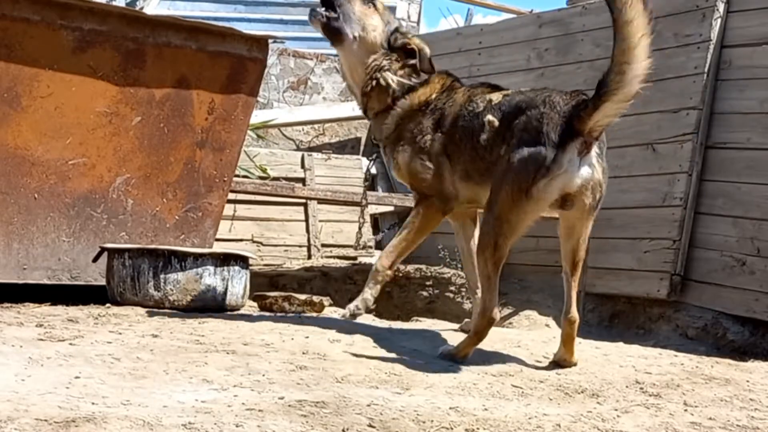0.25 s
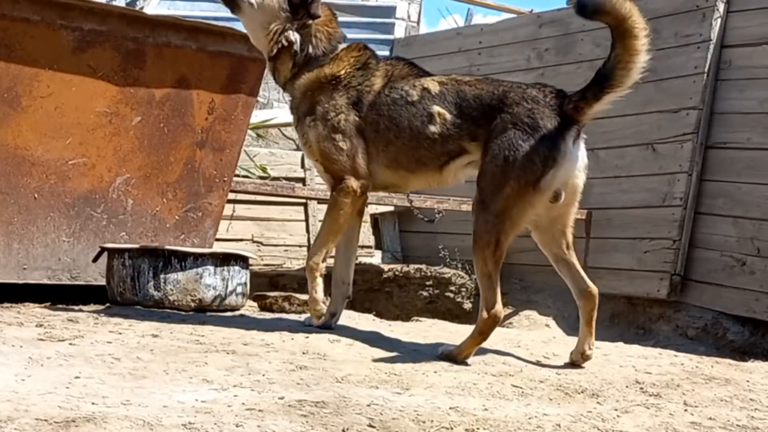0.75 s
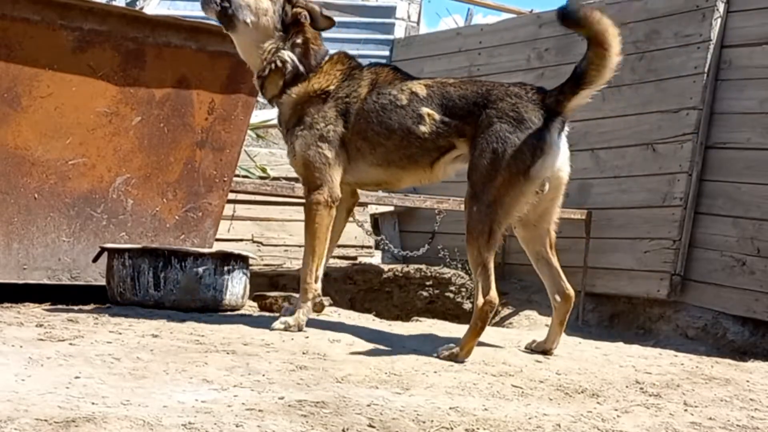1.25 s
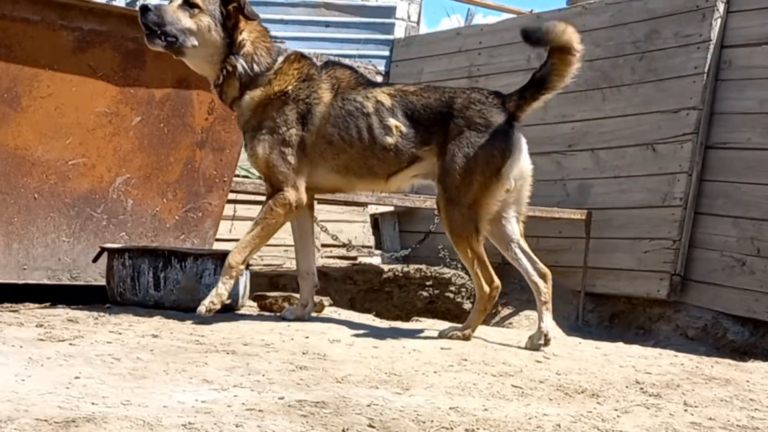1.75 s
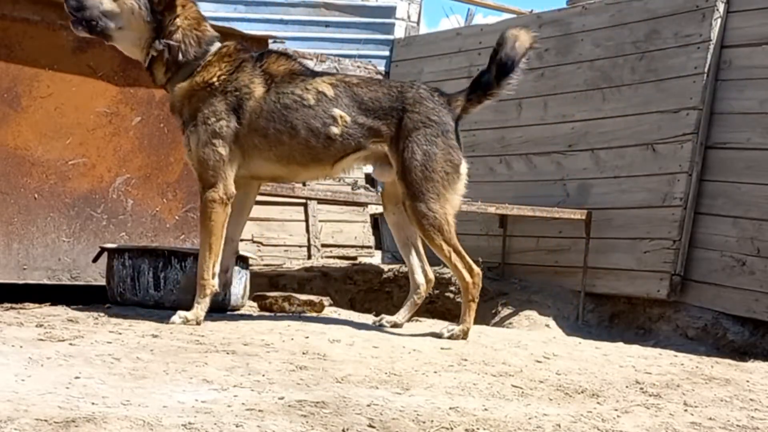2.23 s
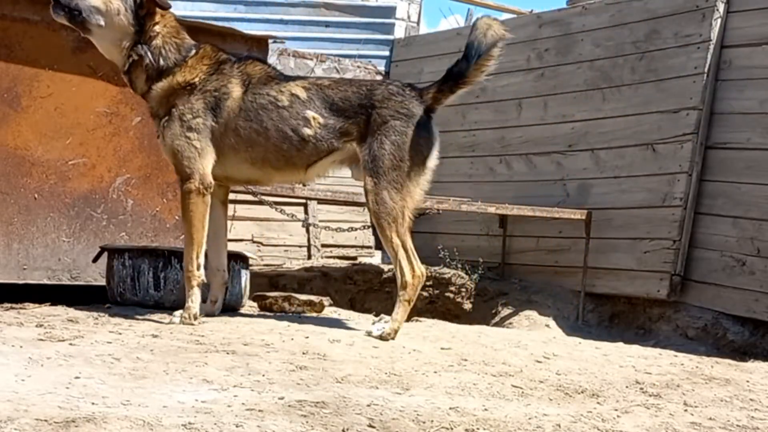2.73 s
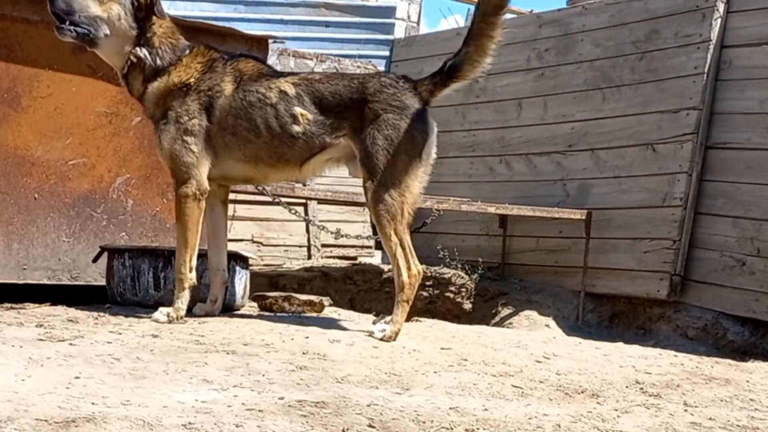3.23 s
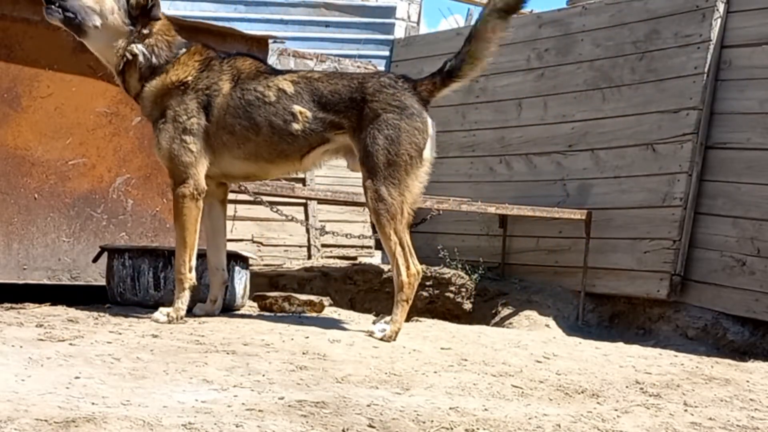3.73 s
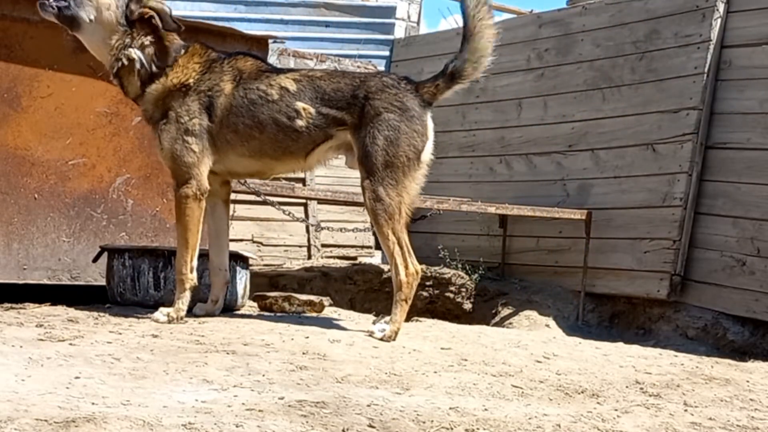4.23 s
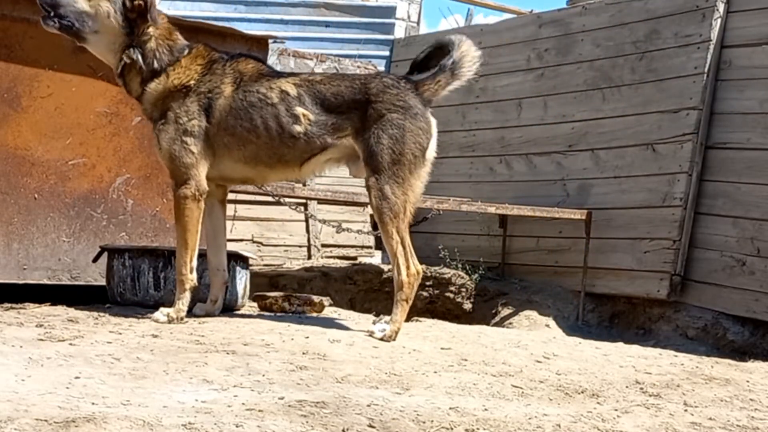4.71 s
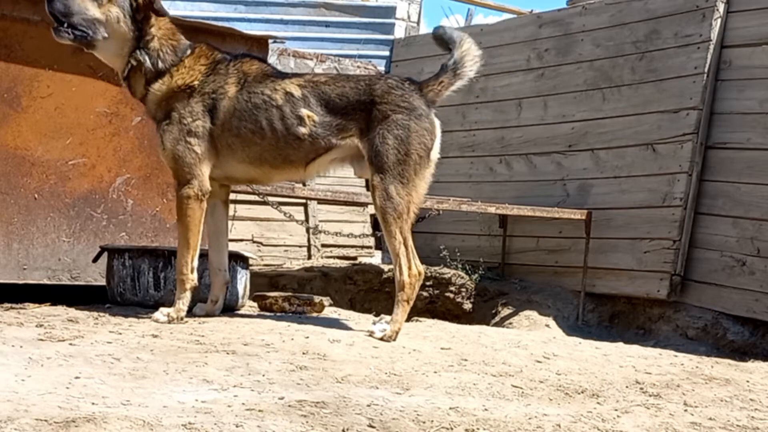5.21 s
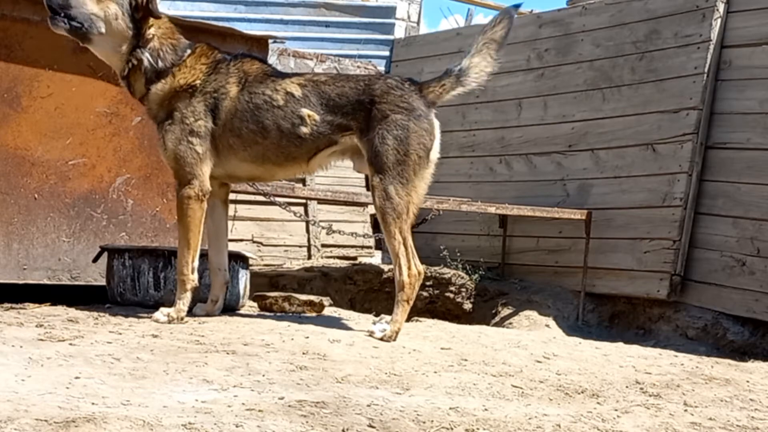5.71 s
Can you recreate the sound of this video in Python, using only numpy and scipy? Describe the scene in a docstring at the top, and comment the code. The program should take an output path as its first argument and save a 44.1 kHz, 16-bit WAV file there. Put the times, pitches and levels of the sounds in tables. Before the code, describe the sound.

A large dog, close and slightly to the left, opens with a short growl. Four quick barks follow at about 0.3, 0.6, 0.9 and 1.3 seconds, linked by a low, rough rumble and trailing off in a soft groan by 1.5 seconds. Under this run a chain slides very faintly and a paw scuffs on grit. A second growl with hard catches builds from 1.6 to 2 seconds. Then come six single barks, at about 2.1, 2.9, 3.7, 4.3, 4.9 and 5.6 seconds, with another faint scuff at 2.2 and a quiet growl around 2.6 seconds. Each bark is chesty, rising and falling in pitch, starting clear and breaking into a rasp. The sheds and fences of the yard add a short echo, and the background is only a very faint hush of outdoor air.

```python
"""A chained dog in a walled yard

A large dog growls, gives four barks linked by a low rumble and ending in a groan, growls again, then
barks six times. Its vocal folds are the source; chest, throat and mouth are the filters. Each bark is
an arch of pitch that starts clear and breaks into a rasp. Paws scuff; sheds and fences echo."""
import sys
import numpy as np
from scipy import signal
from scipy.fft import rfft, irfft, next_fast_len
from scipy.io import wavfile
from scipy.ndimage import map_coordinates

SR = 44100
rng = np.random.default_rng(int(sys.argv[2]) if len(sys.argv) > 2 else 0)


def waveform_to_disk(signal):
    """Save audio, clipped to [-1, 1], as 16-bit WAV at the path in sys.argv[1]."""
    frames = np.transpose(np.atleast_2d(signal))
    scaled = np.clip(frames, -1, 1) * 32767
    samples = np.round(scaled).astype(np.int16)
    wavfile.write(sys.argv[1], SR, samples)


N = 262836

BAND_LIMIT_HZ = 15600


def amp(db):
    """Decibels to gain."""
    return 10 ** (np.asarray(db) / 20)


def unit(x):
    """x scaled to rms 1."""
    return x / np.sqrt(np.mean(x ** 2) + 1e-20)


def along(points, hz):
    """(Hz, value) points read on a log axis."""
    f, v = np.transpose(points)
    return np.interp(np.log(hz + 1), np.log(f), v)


def curves(rows):
    """Sample times of a table's span, then each column at those times."""
    s, *cols = np.transpose(rows)
    t = np.arange(max(round(s[0] * SR), 0), round(s[-1] * SR)) / SR
    return [t] + [np.interp(t, s, c) for c in cols]


def add(track, s, x):
    """Mix x into the track from time s, with its last moments faded."""
    i, n = max(round(s * SR), 0), x.shape[-1]
    fade = np.minimum(np.arange(n)[::-1] / (.008 * SR), 1)
    track[..., i:i + n] += (x * fade)[..., :N - i]


def wobble(n, rate):
    """A smooth random curve, rate knots a second."""
    return map_coordinates(rng.standard_normal(int(n * rate / SR) + 4), [np.arange(n) * rate / SR])


def coloured(x, points):
    """x through a causal filter with the given spectrum."""
    m = 2 * next_fast_len(x.shape[-1] // 2 + 4096)
    cepstrum = irfft(np.log(amp(along(points, np.fft.rfftfreq(m, 1 / SR)))))
    cepstrum[1:m // 2] *= 2
    cepstrum[m // 2 + 1:] = 0
    return irfft(rfft(x, m) * np.exp(rfft(cepstrum)), m)[..., :x.shape[-1]]


def noise(n, points, gate=1):
    """Gated noise of rms 1 with the given spectrum."""
    return unit(coloured(gate * rng.standard_normal(n), points))


def partials(phase, pitch, tract, doubling, smear, count=14):
    """Harmonics under a resonance curve; period doubling adds lines halfway between them."""
    voice, power = 0, 1e-12
    for k in np.arange(1, count + 1) / 2:
        gain = amp(along(tract, k * pitch)) * (doubling if k % 1 else 1)
        stray = smear * k * wobble(len(phase), 130)  # uneven cycles blur the high harmonics most
        voice = voice + gain * np.sin(k * phase + rng.uniform(0, 2 * np.pi) + stray)
        power = power + gain ** 2 / 2
    return voice / np.sqrt(power)


def sliding_noise(points, gate, scale):
    """Time warping multiplies the resonance frequencies of a gated noise by scale."""
    clock = np.cumsum(scale)
    ticks = np.arange(int(clock[-1]) + 2)
    return map_coordinates(noise(len(ticks), points, np.interp(ticks, clock, gate)), [clock])


def blend(tone, air, share):
    """Uncorrelated signals add in power, so tone and turbulence mix at a constant level."""
    share = np.clip(share, 0, .95)
    return np.sqrt(1 - share ** 2) * tone + share * air


def gate(t, attack, release):
    """Trapezoidal envelope over the times t."""
    return np.clip(np.minimum((t - t[0]) / attack, (t[-1] - t) / release), 0, 1)


# Spectrum of the background: (frequency [Hz], level [dB])
AIR = [(25, -40.5), (100, -14), (300, -19.5), (460, -9), (880, -32.5), (1300, -22.5), (2200, -39.5),
       (15000, -43)]

def still_air(level_db=-81):
    """Partly coherent ambient noise: one hush common to both channels, a weaker one in each."""
    return amp(level_db) * (noise(N, AIR) + .5 * np.array([noise(N, AIR), noise(N, AIR)]))


# Decay of the diffuse field: (frequency [Hz], reverberation time [s])
DECAY = [(100, 0.2), (250, .45), (380, .62), (520, .56), (900, 0.61), (2000, 0.45), (5500, 0.85),
         (14000, .45)]
# Scattering by rough ground and boards close by: (frequency [Hz], level [dB])
SCATTER = [(60, -12.5), (130, -19.5), (500, -25.5), (2000, -15.5), (5000, 2), (12000, -7.5)]
# Wall reflections: (delay [s], level [dB])
WALLS = [(0.012, -13), (0.022, -17), (0.057, -28), (0.113, -33), (.19, -42.5)]

def yard(x, tail_db=-28.5, build_s=.0092, scatter_t60=.021, flutter_db=3):
    """Reverberation: close scatter, discrete reflections, then a fluttering diffuse tail."""
    hz, t, bands = signal.stft(rng.standard_normal((3, SR)), SR, nperseg=256)
    decay = amp(-60 * t / along(DECAY, hz)[:, None])
    tails = signal.istft(bands * decay * (1 - np.exp(-t / build_s)), SR, nperseg=256)[1]
    far = tails[0] + tails[1:]  # close microphones share part of the tail
    far *= amp(tail_db) / np.linalg.norm(far[0])
    near = rng.standard_normal(far.shape) * amp(-60 * np.arange(far.shape[1]) / SR / scatter_t60)
    near = coloured(near / np.linalg.norm(near[0]), SCATTER)
    for delay, db in WALLS:
        near[:, round(delay * SR)] += amp(db)
    early, late = [signal.fftconvolve(x, response, axes=1)[:, :N] for response in (near, far)]
    return early + late * amp(flutter_db * wobble(N, 55))


# Direction of the dog: (time [s], lead of the left microphone [ms])
BEARING = [(0, .07), (.7, 0.1), (1.7, 0.12), (2.7, 0.19), (6, 0.19)]

def microphones(x):
    """Time and level cues: the dog stands to the left, so that side is earlier and louder."""
    i = np.arange(N)
    lead = np.interp(i / SR, *np.transpose(BEARING)) * SR / 1000
    left = map_coordinates(x[0], [i + lead / 2])
    right = map_coordinates(x[1], [i - lead / 2])
    return np.array([left, right]) * amp([[.6], [-.6]])


# Envelope of the sliding chain: (time [s], level [dB])
CHAIN_LEVEL = [(0.33, -73.5), (0.428, -67.5), (0.486, -69), (0.942, -87), (1.1, -78), (1.2, -85.5),
               (1.3, -90)]
# Resonances of its links: (frequency [Hz], level [dB])
LINKS = [(2000, -38), (2750, -19), (3050, 5), (3400, -15.5), (5000, -25.5), (6200, -13), (9000, -30.5),
         (11000, -15), (12500, -29.5)]

def chain(gain_db=4):
    """Sliding friction rings the links faintly as the dog steps about."""
    out = np.zeros(N)
    t, db = curves(CHAIN_LEVEL)
    rubbing = amp(3 * wobble(len(t), 40))
    add(out, t[0], amp(db + gain_db) * noise(len(t), LINKS, rubbing))
    return out


# Paw strokes: (time [s], level [dB], time to fall 60 dB [s])
SCUFFS = [(.664, -34, .1), (2.187, -39.5, .2), (2.218, -47, .35)]
# Spectrum of dry grit: (frequency [Hz], level [dB])
GRIT = [(800, -28.5), (2500, 2), (4000, 4), (7000, -7), (10000, -14.5), (15000, -13.5)]

def scuffs(gain_db=-7):
    """Granular friction: a paw on grit makes a spiky burst that decays exponentially."""
    out, t = np.zeros(N), np.arange(SR // 4) / SR
    for start, db, t60 in SCUFFS:
        grains = amp(5 * wobble(len(t), 600))
        add(out, start, amp(db + gain_db - 60 * t / t60) * noise(len(t), GRIT, grains))
    return out


# Contour of the groan: (time [s], pitch [Hz], level [dB])
GROAN_CONTOUR = [(1.32, 215, -38.5), (1.354, 170, -45), (1.41, 128.8, -48), (1.492, 128, -44.5),
                 (1.53, 124, -54)]

def groan(gain_db=-1):
    """Low-pitched phonation: the run of barks trails off in a soft hum of blurred harmonics."""
    out = np.zeros(N)
    t, pitch, db = curves(GROAN_CONTOUR)
    phase = 2 * np.pi * np.cumsum(pitch) / SR
    tract = [(130, 3.5), (250, -8.0), (400, 3.5), (800, -41.5)]  # (frequency [Hz], level [dB])
    add(out, t[0], amp(db + gain_db) * partials(phase, pitch, tract, doubling=.05, smear=.78))
    return out


# Growls: (start [s], end [s], first level [dB], last level [dB], relative hiss level [dB])
GROWLS = [(0, .19, -31.5, -58, -17), (1.59, 1.974, -53.5, -42.5, -17.5), (2.45, 2.731, -49, -49.5, -22)]
# Spectra of the growling throat and of its escaping air: (frequency [Hz], level [dB])
GROWL_TONE = [(20, -51), (55, -6), (110, 6.5), (200, -4), (370, 1.5), (500, 3.5), (800, -18), (1200, -7.5),
              (1700, -25.5), (2400, -19.5), (4000, -47.5)]
GROWL_HISS = [(1000, -21.5), (2300, 1), (4000, -3.5), (6000, -6), (8500, -17.5), (15000, -21.5)]

def growls(flap_hz=35, throat_db=-1):
    """Pulse phonation: each slow, uneven flap of loose folds thumps the throat and lets out air."""
    out = np.zeros(N)
    for start, end, first_db, last_db, hiss_db in GROWLS:
        t, db = curves([(start, first_db), (end, last_db)])
        n = len(t)
        cycles = np.cumsum(flap_hz * np.exp(.14 * wobble(n, 25))) / SR
        strength = amp(1.8 * wobble(n, 30))
        flaps = np.diff(np.floor(cycles), prepend=0) * strength
        spurts = strength * (np.exp(-(cycles % 1) / .43) + .14)
        tone = unit(unit(coloured(flaps, GROWL_TONE)) + 2.5 * noise(n, GROWL_TONE, spurts))
        voice = amp(throat_db) * tone + amp(hiss_db) * noise(n, GROWL_HISS, spurts)
        add(out, t[0], amp(db) * gate(t, attack=.027, release=.021) * voice)
    return out


# Hard catches in the growl: (time [s], level [dB], relative hiss level [dB])
SNARLS = [(0.014, -28.5, -31.5), (0.038, -27.5, -35), (1.654, -39.5, -26.5), (1.756, -42, -18),
          (1.855, -29.5, -24.5), (1.885, -29, -19.5), (2.507, -40, -25.5), (2.609, -37, -32),
          (2.635, -40, -35.5), (2.658, -37, -36.5)]

def snarls(thump_db=-10, edge_db=-8, ring_hz=450, attack_s=.00083):
    """Impulse excitation: a single hard flap gives a damped ring with an edge of hiss."""
    out, t = np.zeros(N), np.arange(SR // 20) / SR
    swell = 1 - np.exp(-t / attack_s)
    for start, db, hiss_db in SNARLS:
        ring = np.sin(2 * np.pi * ring_hz * t) * amp(-60 * t / .027) * swell
        breath = noise(len(t), GROWL_TONE, swell * amp(-60 * t / .034))
        thump = unit(unit(ring) + .3 * breath)
        edge = noise(len(t), GROWL_HISS, amp(-60 * t / .012))
        add(out, start, amp(db + thump_db) * thump + amp(db + hiss_db + edge_db) * edge)
    return out


# Chest response between barks that run together: (frequency [Hz], level [dB])
GRUMBLE = [(20, -53), (60, -22.5), (120, -13), (200, -4.5), (300, -2), (430, 0), (530, -6), (640, -27),
           (900, -70.5)]

def grumble(start=.38, end=1.18, level_db=-37.5, top_hz=470, lowest_hz=169.4, glide_hz_per_s=2100):
    """Sustained phonation: within the run the voice sinks to a rough, low note and climbs again."""
    out, t = np.zeros(N), np.arange(start, end, 1 / SR)
    n = len(t)
    from_top = np.min([np.abs(t - row[0]) for row in BARKS], axis=0)
    note = np.maximum(top_hz - glide_hz_per_s * from_top, lowest_hz)
    pitch = note * (1 + .05 * wobble(n, 170))
    phase = 2 * np.pi * np.cumsum(pitch) / SR
    tone = partials(phase, pitch, GRUMBLE, doubling=.16, smear=.4)
    voice = blend(tone, noise(n, GRUMBLE), share=.51)
    add(out, start, amp(level_db + 2 * wobble(n, 60)) * gate(t, .026, .026) * voice)
    return out


# Spectrum of air passing teeth and lips: (frequency [Hz], level [dB])
HISS = [(2000, -24), (3000, -3.5), (3500, -1), (4150, -15.5), (5150, 2.5), (6100, 2.5), (6850, -1.5),
        (7700, -12), (9500, -15.5), (12500, -9), (15500, -14)]

def teeth(puffs, scale, ring_t60=.014):
    """Turbulence excites narrow resonances, new for each bark and partly coherent across channels."""
    t = np.arange(SR // 50) / SR
    cavity = rng.standard_normal(len(t)) * amp(-60 * t / ring_t60)
    air = np.array([sliding_noise(HISS, puffs, scale) for _ in range(3)])
    return unit(signal.fftconvolve(air[0] + air[1:], cavity[None], axes=1)[:, :len(puffs)])


# Mouth response in the early barks and, head turned away, the late: (frequency [Hz], level [dB])
MOUTH_EARLY = [(550, -46), (760, -8.5), (880, -3), (1000, -10), (1170, -2.5), (1310, 7.5), (1490, -13.5),
               (1640, -12), (1820, -7.5), (2080, -17.5), (2400, -31), (3150, -28), (3900, -47.5),
               (6000, -55)]
MOUTH_LATE = [(550, -44.5), (750, -5), (860, 4), (1000, -7.5), (1170, -1), (1350, 2.5), (1580, -6.5),
              (1880, -12), (2130, -7), (2450, -21.5), (3000, -25.5), (3450, -25), (3950, -37), (6000, -51)]

def mouth(phase, pitch, rough, puffs, jaw, early):
    """Formants filter harmonics and breath; a shutting jaw lowers them by the factor jaw."""
    tract = MOUTH_EARLY if early else MOUTH_LATE
    tone = partials(phase, pitch / jaw, tract, doubling=rough ** 2, smear=.07 + .2 * rough)
    return blend(tone, sliding_noise(tract, puffs, jaw), 1.05 * rough)


# Throat resonance: (frequency [Hz], level [dB])
THROAT = [(400, -53), (540, -6), (635, 2.5), (700, -5), (780, -14.5), (1000, -54)]

def throat(phase, pitch, rough, puffs):
    """A single resonance picks out the period doubling and turbulence of the rasp."""
    tone = partials(phase, pitch, THROAT, doubling=rough, smear=.4 * rough, count=8)
    return blend(tone, noise(len(pitch), THROAT, puffs), .75 * rough)


# Chest response with taut folds, then with slack folds: (frequency [Hz], level [dB])
CHEST = [(20, -66), (45, -26.5), (75, -19.5), (115, -14.5), (160, -16), (260, -12), (340, -7), (400, -6.5),
         (455, 1), (540, -5.5), (640, -36), (900, -68.5)]
GRUNT = [(20, -66), (45, -37), (75, -22.5), (115, -12), (170, -15), (270, -16.5), (380, -2.5), (450, 3.5),
         (530, -2.5), (640, -30.5), (900, -70)]

def chest(phase, pitch, rough, slack, flutter, early):
    """Low resonances carry the fluttering fundamental, which gives way to noise as folds slacken."""
    n = len(pitch)
    tone = partials(phase, pitch, CHEST, doubling=.043 * rough, smear=.42 * rough, count=10)
    flutter_db = 8 * np.clip(flutter, 0, .5) * np.tanh(wobble(n, 110))
    spectrum, loose = (GRUMBLE, .7) if early else (GRUNT, 1.7)  # early on the folds never quite stop
    return blend(tone * amp(flutter_db), noise(n, spectrum), .11 * flutter * rough + loose * slack)


def envelope(t, pressure, opens, shuts, swell_db, attack, release, linger, sag):
    """Amplitude modulation [dB]: a swell with pressure, edges set by the jaw, a sag [dB/s]."""
    edges = np.maximum(-opens - t, 0) / attack + np.maximum(t - shuts - linger, 0) / release
    return swell_db * (pressure - 1) - 60 * edges - sag * t


# Resting pitch of the folds, which slacken after the run: (time [s], pitch [Hz])
REST_PITCH = [(.9, 174.9), (1.3, 140), (2.9, 116.1)]
# Barks: (time of top [s], top pitch [Hz], rise [s], fall [s], time of voice break [s], rasp [0-1],
# flutter [0-1], formant drop [0-1], mouth open before top [s], mouth open after top [s],
# chest fade after top [dB/s], chest level [dB], throat level [dB], mouth level [dB], hiss level [dB])
BARKS = [(.303, 462.1, .089, .095, .262, .6, 0.4, .12, .051, 0.076, 89.5, -8, -24.5, -22.5, -51.5),
         (.600, 460, .077, .094, 0.58, .95, .3, .16, .066, .066, 109.5, -8.5, -19, -25.5, -53),
         (.913, 422.2, .09, 0.087, 0.87, .75, .48, .22, .076, .059, -20, -17, -26, -31.5, -59.5),
         (1.255, 420.6, .1, .065, 1.273, .55, 0.5, .06, .068, .046, -61.5, -16, -18.5, -28.5, -52.5),
         (2.097, 467.7, 0.09, .094, 2.066, .75, 0.4, .15, .067, .06, -50.5, -10, -18.5, -23.5, -49.5),
         (2.882, 472, .095, .096, 2.89, 0.97, .05, .1, 0.068, .044, 45, -7.5, -26.5, -27, -53),
         (3.655, 480.6, .118, .077, 3.628, 0.7, .15, 0, .078, .02, 1.5, -10, -29.5, -23.5, -48.5),
         (4.287, 455.1, .108, .072, 4.274, 0.8, .08, 0.05, .068, .028, 70, -11.5, -26, -23.5, -50.5),
         (4.915, 484.5, .102, .094, 4.890, 0.97, .05, .14, 0.066, .044, 19.5, -8.5, -30, -27.5, -54.5),
         (5.583, 465.9, .106, .085, 5.64, .7, .05, .05, 0.068, .032, 9, -10, -31, -26.5, -51.5)]

def barks(early_count=5, jitter=.016, clear_roughness=.31, break_s=.007, chest_hz=471, hum_db=-60.5):
    """Pressure-driven oscillation: pitch rises and falls, and clean cycles break up near the top."""
    out = np.zeros((2, N))
    t = np.arange(-.14, .18, 1 / SR)  # time from the top of the arch
    n = len(t)
    for i, (top, top_hz, rise, fall, breaks, rasp, flutter, drop, opens, shuts, fade,
            chest_db, throat_db, mouth_db, hiss_db) in enumerate(BARKS):
        early = i < early_count
        pressure = np.exp(-np.abs(t / np.where(t < 0, rise, fall)) ** 2.6)
        slack = (1 - pressure) ** 2  # slack folds beat unevenly
        since_break = t + top - breaks
        broken = (1 + np.tanh(since_break / break_s)) / 2
        rough = np.clip(clear_roughness + (rasp - clear_roughness) * broken + .5 * slack, 0, .95)
        rest_hz = np.interp(top, *np.transpose(REST_PITCH))
        note = rest_hz + (top_hz - rest_hz) * pressure
        pitch = note * (1 + (jitter + .09 * slack) * wobble(n, 170))
        phase = 2 * np.pi * np.cumsum(pitch) / SR
        puffs = (1 + np.cos(phase)) / 2 + .5  # air escapes once a cycle
        jaw = 1 - drop * (1 + np.tanh((t - .015) / .025)) / 2

        gesture = t, pressure, opens, shuts
        chest_db += envelope(*gesture, swell_db=21.5, attack=.18, release=.2259, linger=0, sag=-3.5)
        throat_db += envelope(*gesture, swell_db=22, attack=.08, release=.15, linger=.02, sag=64)
        mouth_db += envelope(*gesture, swell_db=24, attack=.072, release=.14, linger=.001, sag=26)
        hiss_db += envelope(*gesture, swell_db=15, attack=.11, release=.65, linger=.006, sag=52)
        catch_db = 26 * flutter * np.exp(-(since_break / .008) ** 2)  # a dip as the voice breaks
        bloom_db = 3 * np.exp(-((note - chest_hz) / 33) ** 2)  # the pitch meets the chest resonance
        clear = (1 - broken) * pressure ** 4  # a clear, high voice misses the throat, rings the mouth
        chest_db += bloom_db - catch_db - fade * np.maximum(t, 0) - 1
        throat_db += -12.5 * clear - .5
        mouth_db += 4.5 * clear + .5

        low = amp(chest_db) * chest(phase, pitch, rough, slack, flutter, early)
        upper = (amp(throat_db) * throat(phase, pitch, rough, puffs)
                 + amp(mouth_db) * mouth(phase, pitch, rough, puffs, jaw, early)
                 + amp(hiss_db) * teeth(puffs, jaw ** .12))
        hum = amp(hum_db) * gate(t, attack=.04, release=.088) * unit(np.sin(phase))
        shimmer = amp(2 * wobble(n, 55))
        add(out, top + t[0], hum + low + shimmer * upper)
    return out


def scene():
    """Superposition of the dog's direct sound, its reverberation and the ambient noise."""
    dog = microphones(barks() + grumble() + growls() + snarls() + groan() + scuffs() + chain())
    return dog + yard(dog) + still_air()


def record(dry):
    """Soft saturation rounds the highest peaks; an ideal low-pass filter limits the band."""
    held = dry / (1 + np.abs(dry) ** 12) ** (1 / 12)
    m = next_fast_len(N + SR // 4)
    return irfft(rfft(held, m) * (np.fft.rfftfreq(m, 1 / SR) < BAND_LIMIT_HZ), m)[:, :N]


dry = scene()
out = record(dry)
waveform_to_disk(out)
```